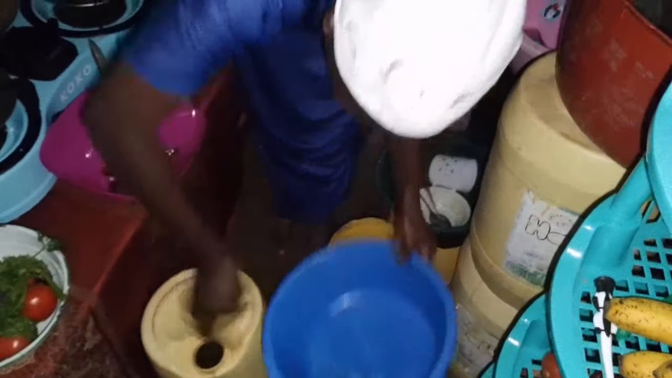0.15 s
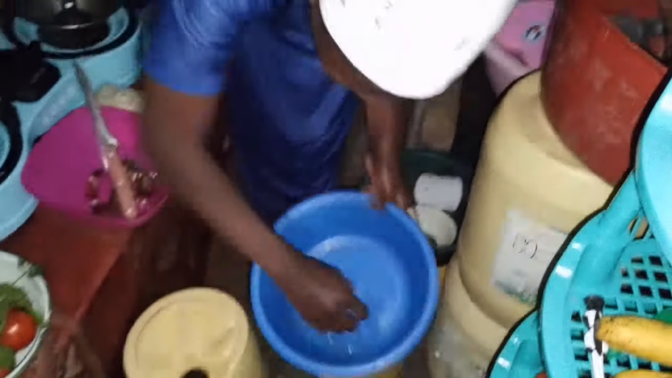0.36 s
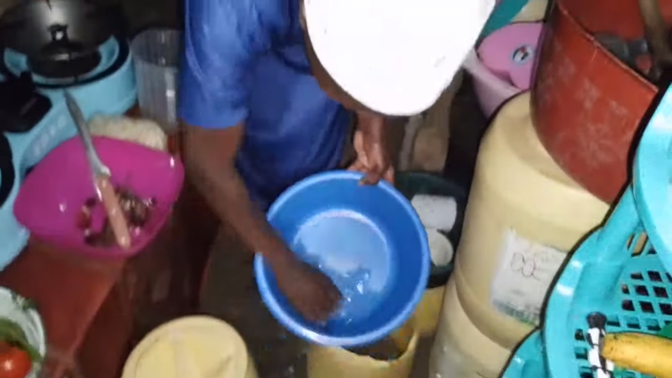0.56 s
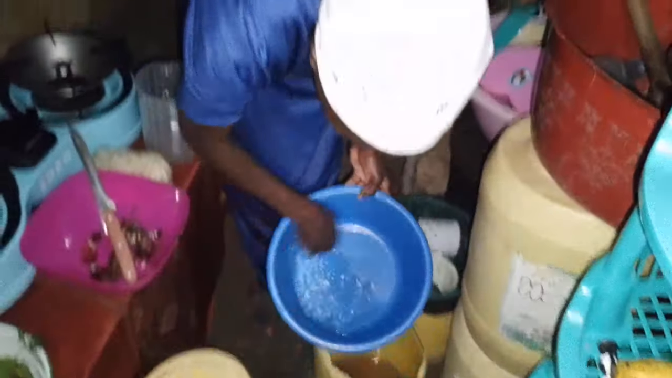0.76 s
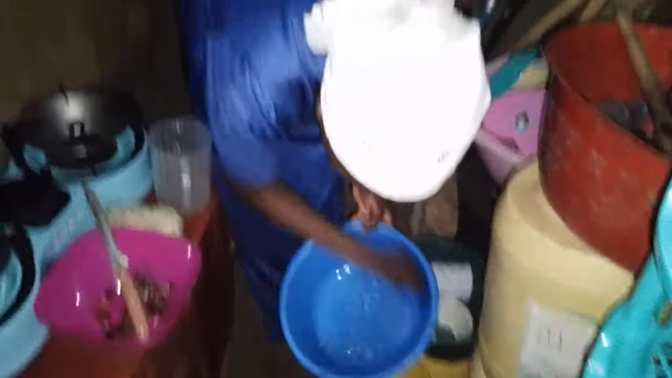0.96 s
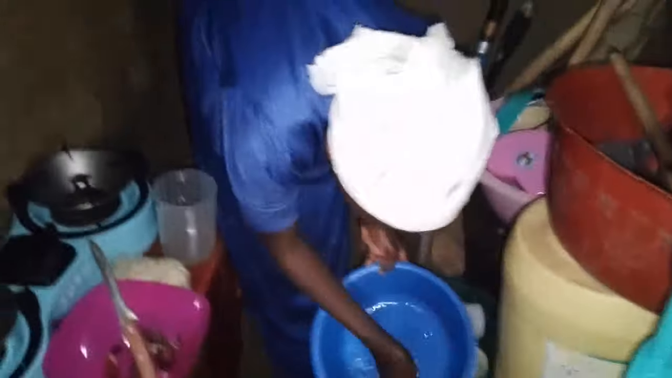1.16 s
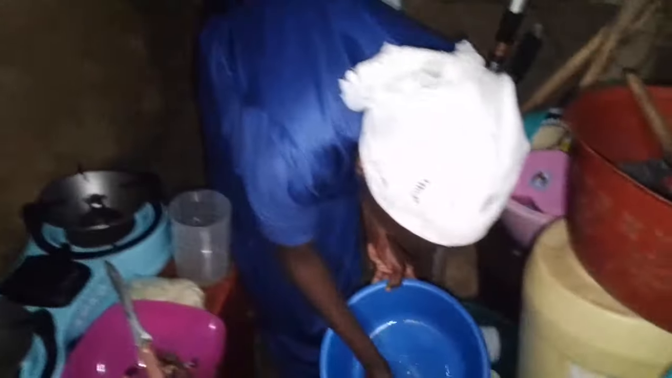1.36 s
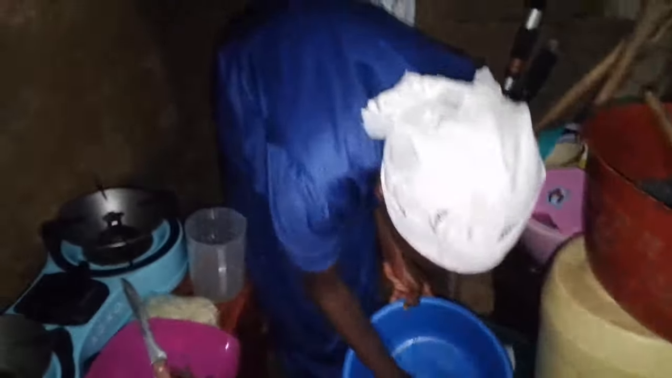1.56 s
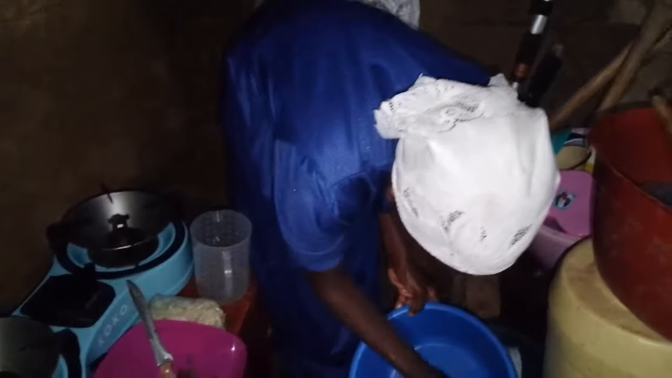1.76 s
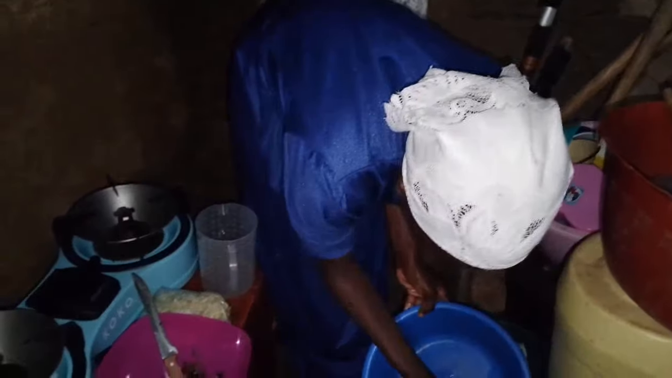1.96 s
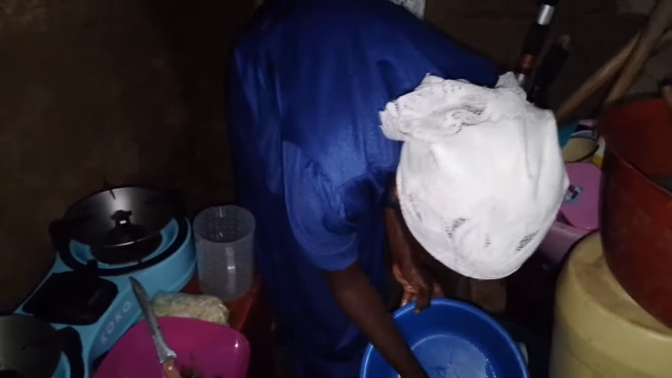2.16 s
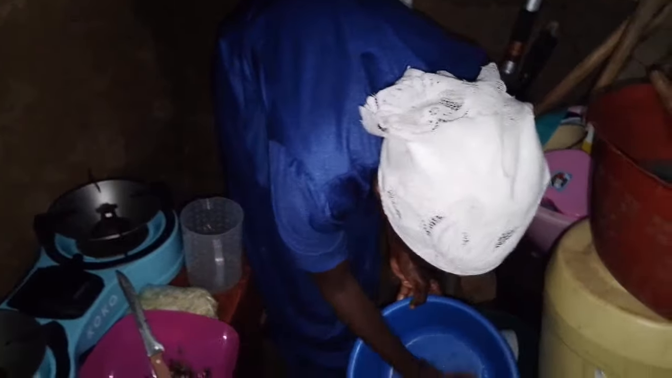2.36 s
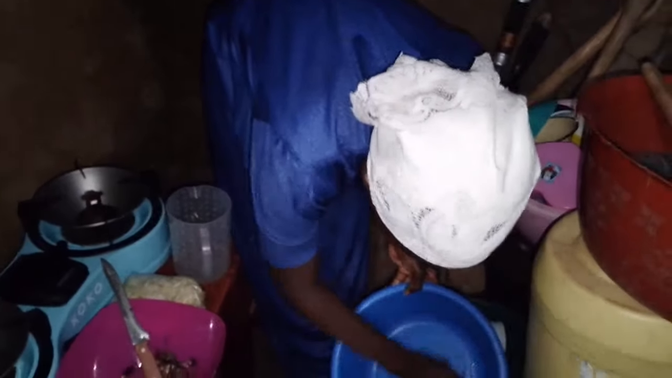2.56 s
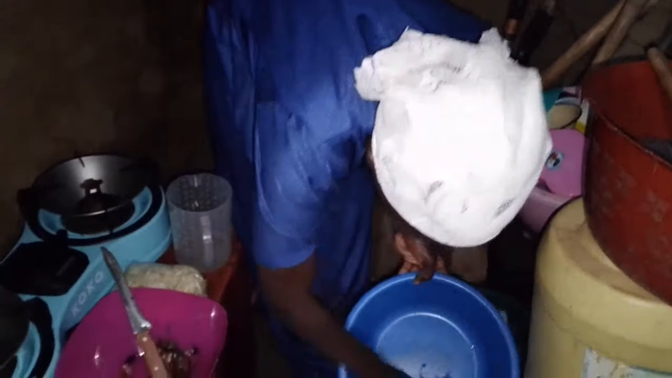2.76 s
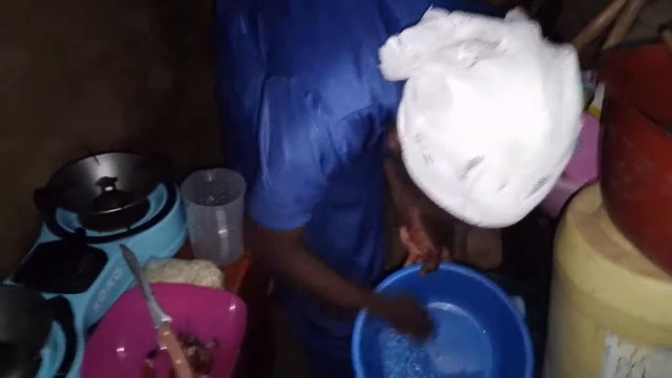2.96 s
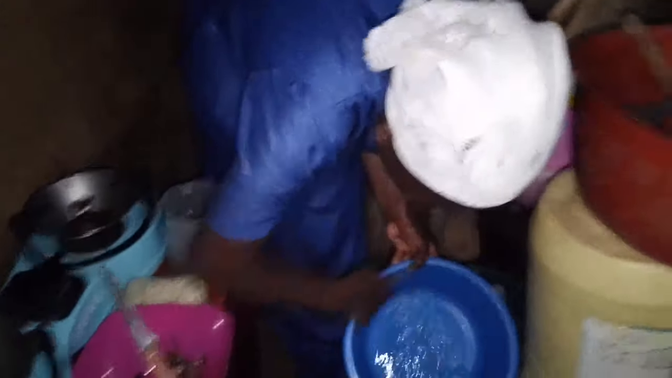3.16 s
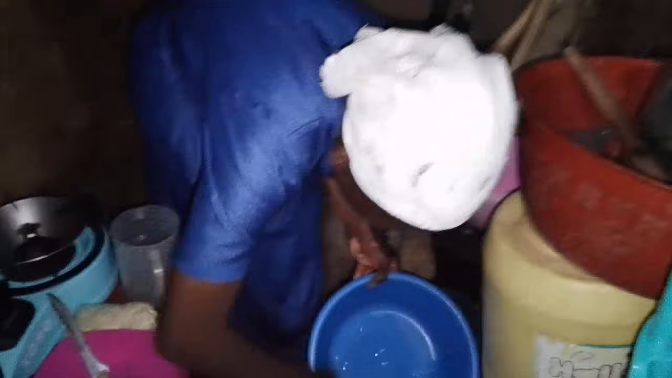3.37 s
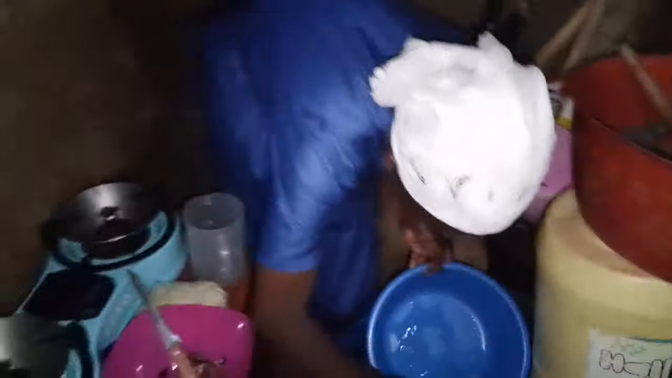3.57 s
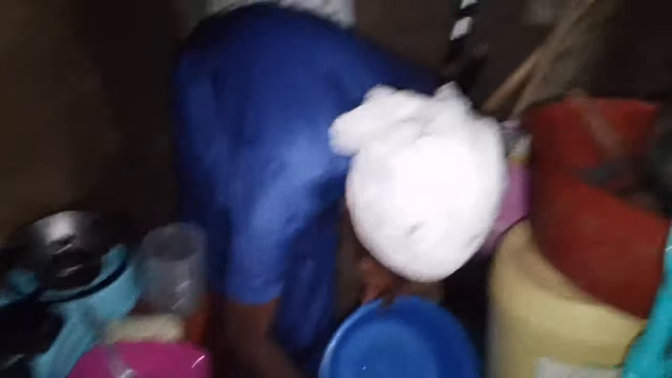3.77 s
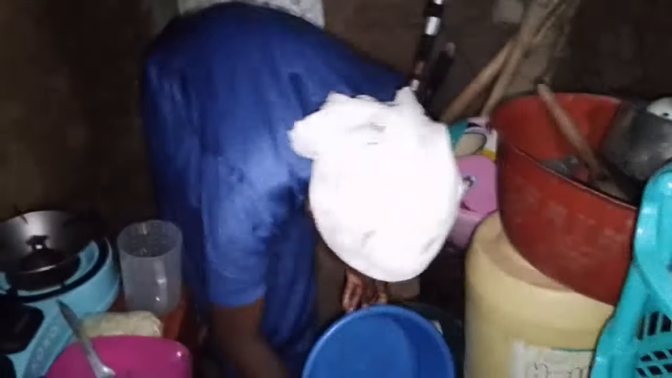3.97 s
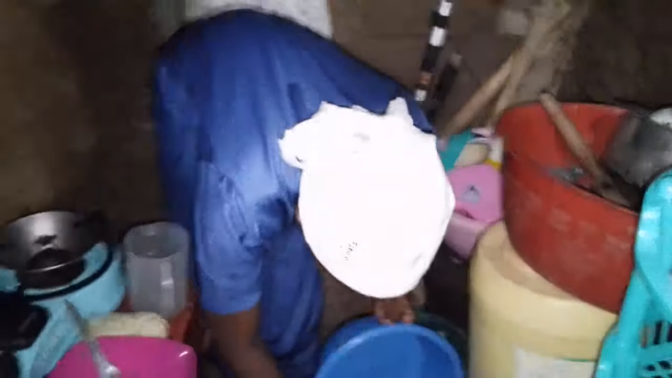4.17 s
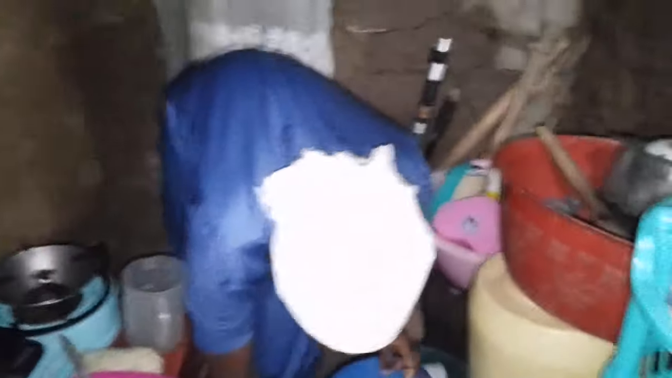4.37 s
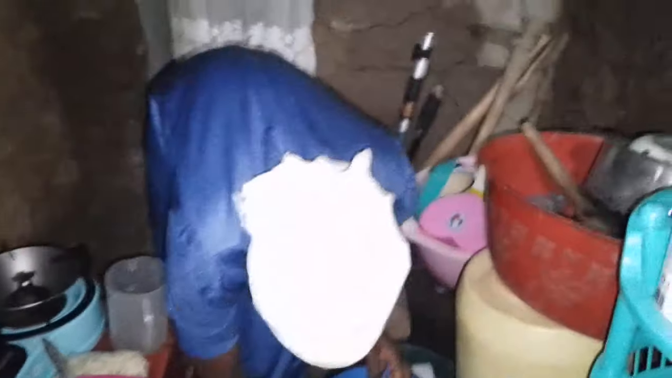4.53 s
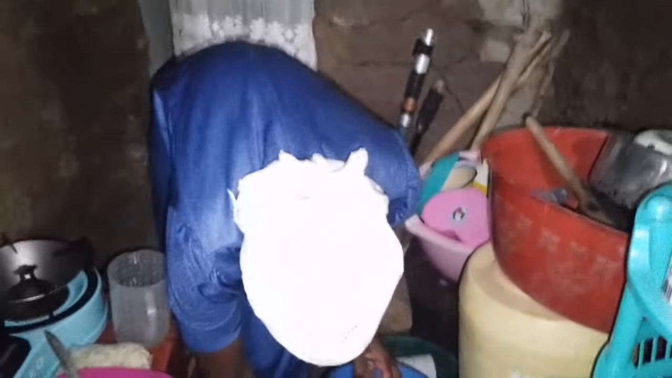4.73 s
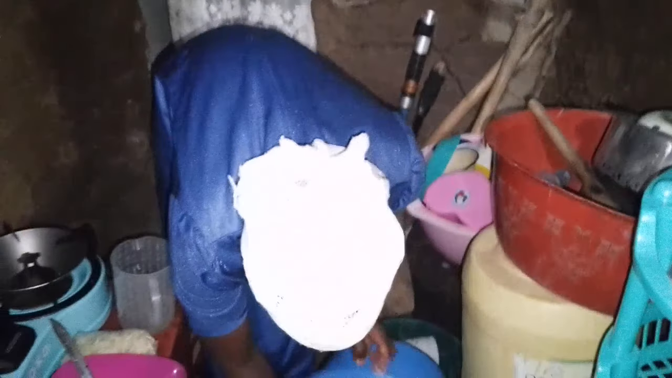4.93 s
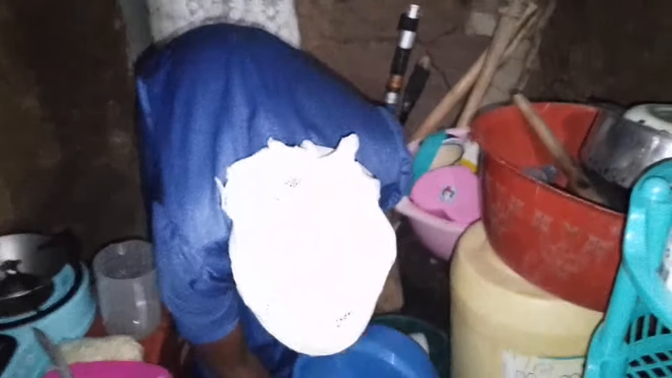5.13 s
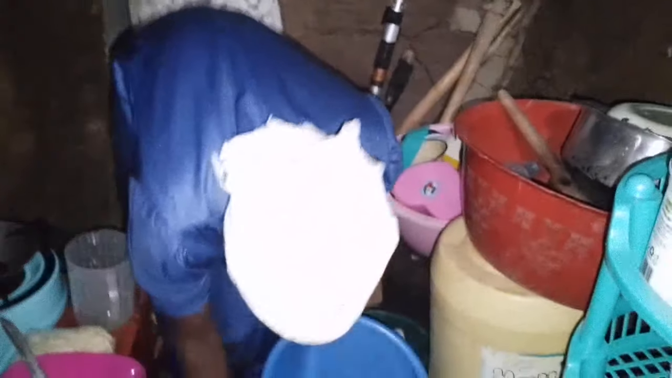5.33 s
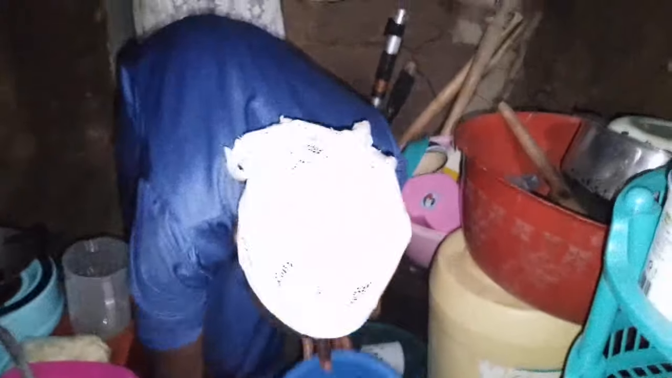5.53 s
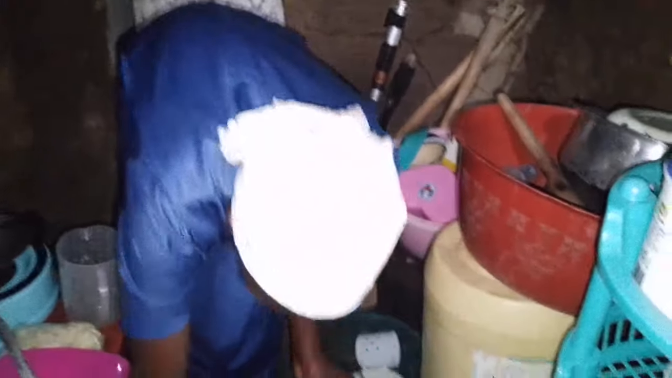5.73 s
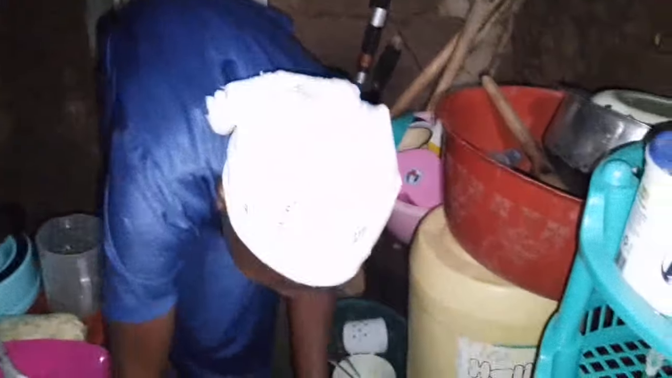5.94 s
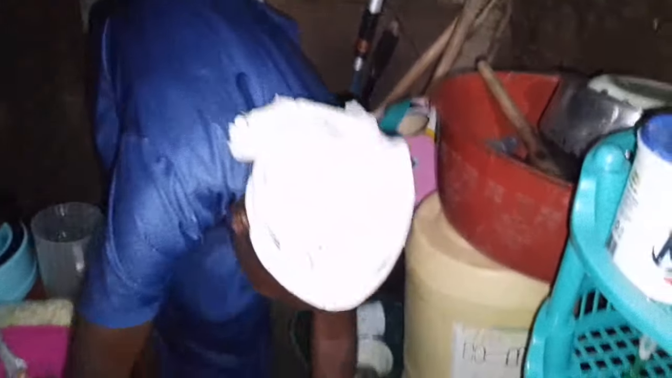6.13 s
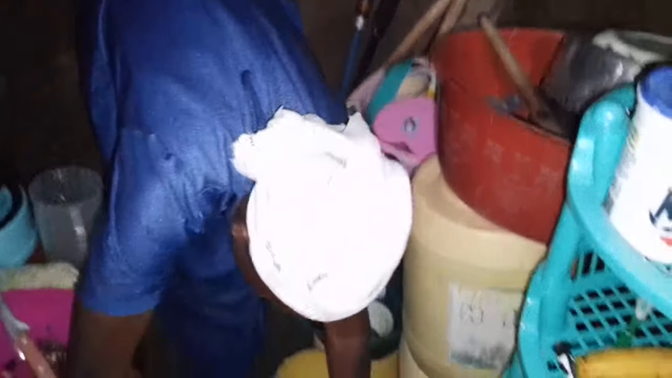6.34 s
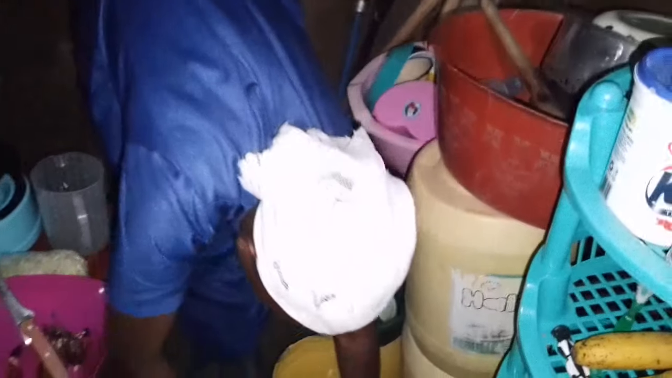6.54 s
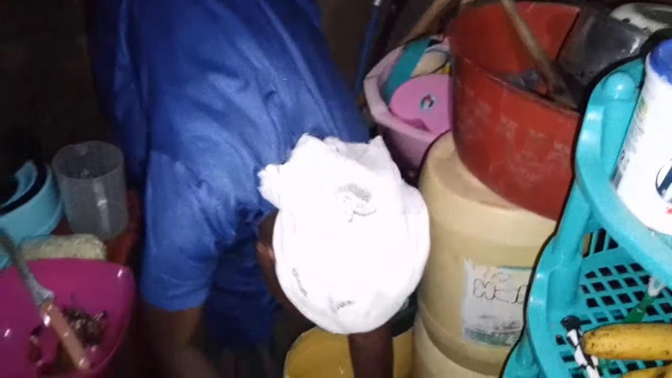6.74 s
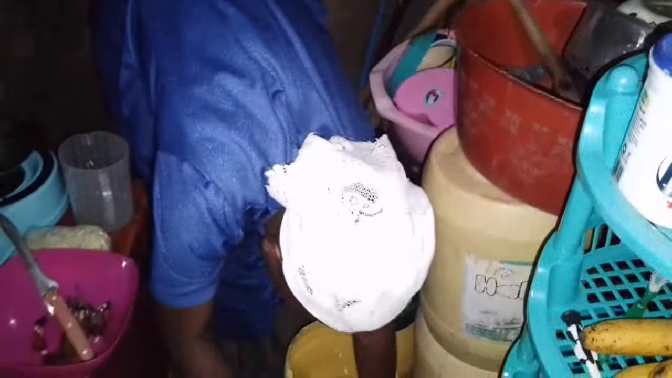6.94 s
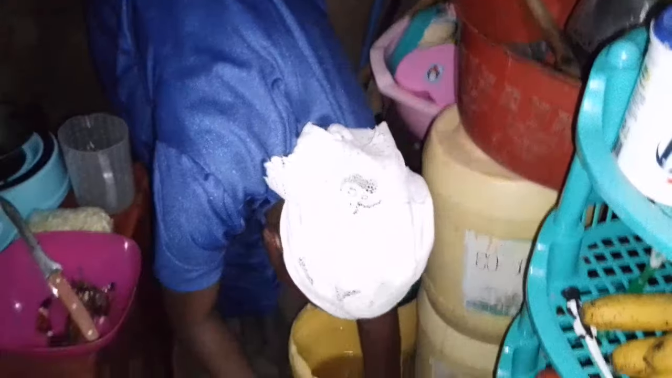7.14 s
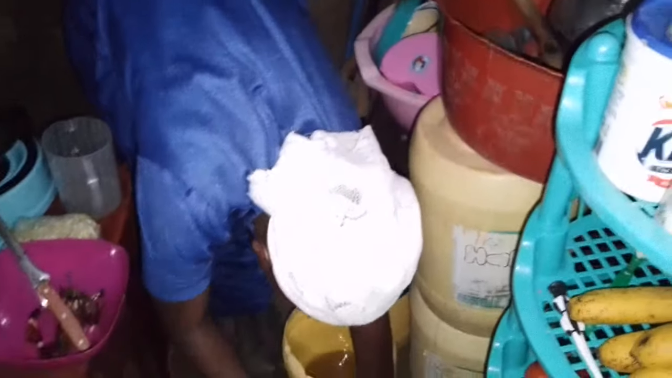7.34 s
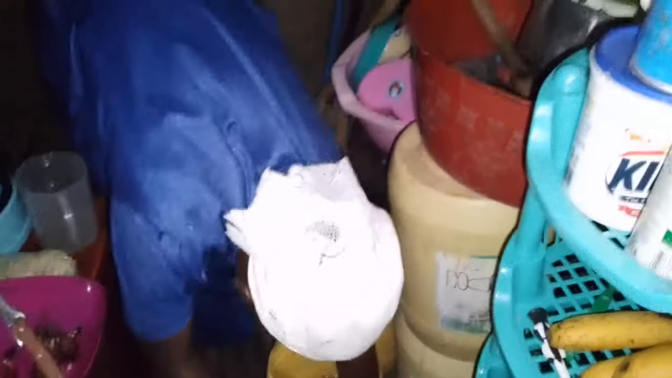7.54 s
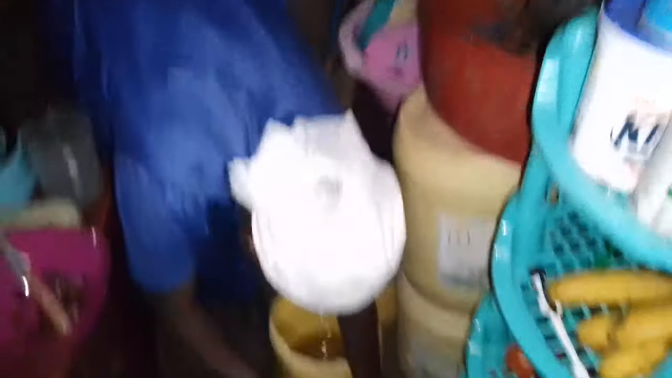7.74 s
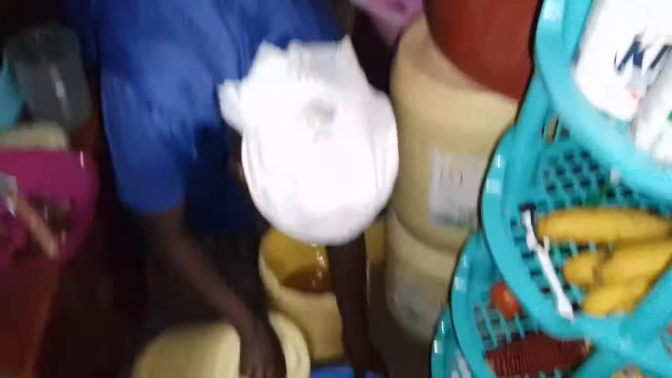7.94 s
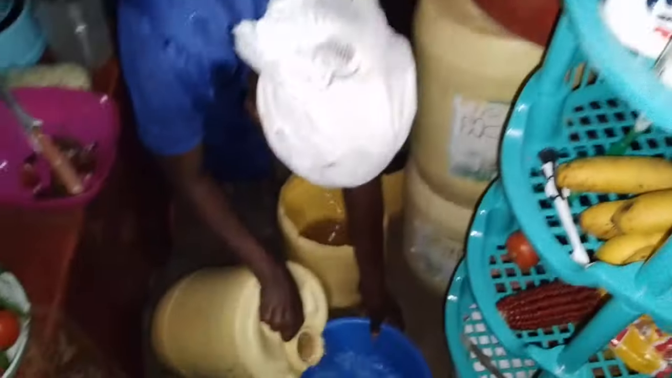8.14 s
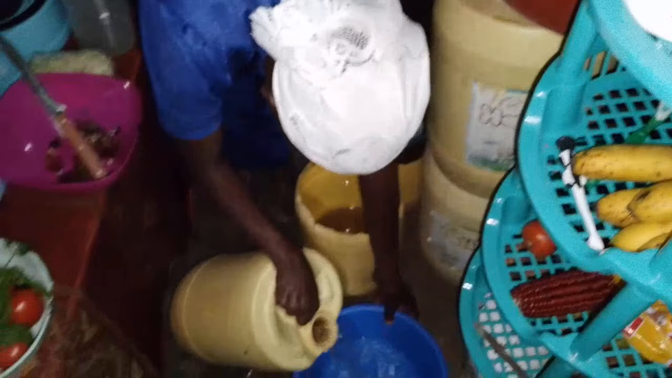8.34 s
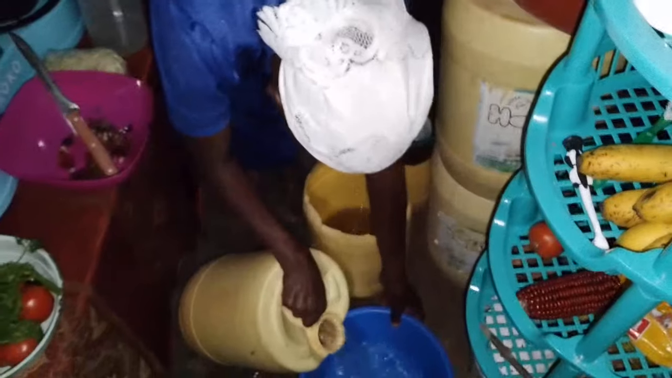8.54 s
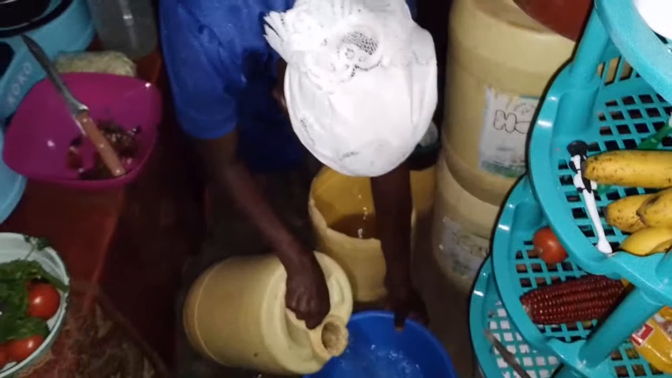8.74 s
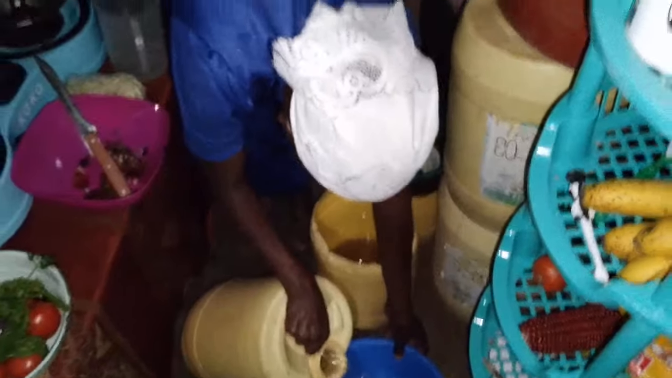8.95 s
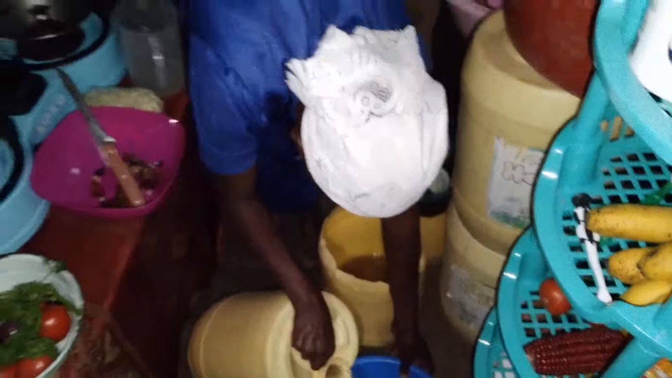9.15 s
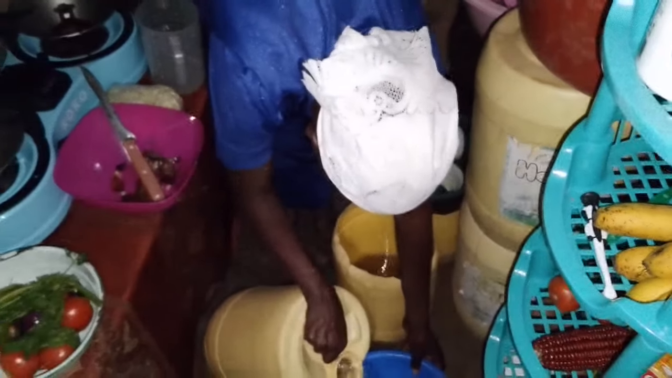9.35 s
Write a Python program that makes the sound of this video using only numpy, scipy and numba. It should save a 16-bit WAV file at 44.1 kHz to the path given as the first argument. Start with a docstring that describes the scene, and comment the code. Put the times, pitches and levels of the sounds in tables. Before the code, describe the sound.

A close phone microphone in a small, barely reverberant kitchen, with faint shrill crickets and low rumble behind. At 0 s there is a soft hollow plastic boom and near quiet; from 0.45 to 0.85 s a hand slaps water in a basin, bright and bubbly. Light swirling follows, with splashes at 1.4 and 1.7 s. A busier burst runs from 2.2 to 3.5 s, with sharp drops, low wall thuds and a strong slap near 2.55. It thins to a tiny drip at 3.75. From 4.3 to 4.9 s the water is tipped into a bucket: a dense gush, hollow knocks and gulps. Quiet with slight sloshes and soft plastic bumps lasts until 6.6. Splashes and heavier thumps at 6.7 to 7.3 begin the pouring, which hesitates, then from 7.8 becomes a loud, steady, gurgling, splashing stream until the end around 9.4 s.

```python
"""Water slaps and swirls round a plastic basin, is tipped into a bucket, then pours from a jerrycan.
Swarms of dying sines make the bubbles (small, large) and the fine spray; noise and sines make each slap,
smack, gulp and knock, and wide resonances boom like plastic walls as the basin is set down.
Crickets shrill outside as a band of noise; a small kitchen adds sparse reflections.
A phone microphone listens from close by; faint bands drop away towards silence."""
import sys
import numpy as np
from scipy import signal
from scipy.fft import rfft, irfft, next_fast_len
from scipy.io import wavfile
from scipy.ndimage import uniform_filter1d
from numba import njit

SR = 44100
rng = np.random.default_rng(int(sys.argv[2]) if len(sys.argv) > 2 else 0)


def store_pcm(level_fs):
    """Save levels as 16-bit WAV."""
    pcm = np.round(np.clip(level_fs, -1, 1) * 32767).astype(np.int16)
    wavfile.write(sys.argv[1], SR, np.atleast_2d(pcm).T)


N = 414540  # length in samples

# Knocks and glugs in the plastic vessels.
# Each row: start in seconds, level in dB before the ring builds up, pitch in Hz.
KNOCK_ROWS = [(0.009, -33, 322), (2.088, -28, 160), (2.231, -28, 150.7), (2.616, -27, 480),
              (2.62, -25.5, 1042), (2.7, -28, 426), (3.362, -41, 441), (3.429, -33, 425),
              (4.32, -24.5, 886), (4.372, -20, 809), (4.499, -24.5, 868), (4.578, -17, 431),
              (4.658, -20, 422), (5.532, -31, 185), (5.535, -32, 300), (6.013, -33, 184), (6.61, -36, 407),
              (6.696, -17.5, 402), (6.72, -21, 480), (6.96, -18.5, 113), (6.962, -26, 600),
              (7.105, -24, 174), (7.108, -28, 600), (7.376, -25, 450), (7.641, -30, 190), (7.81, -33, 160),
              (7.935, -33, 191), (8.554, -20, 794)]


def water():
    """The moving water: bubbles and spray surge together, and the vessels ring and boom under them."""
    # The water between waves. Each row: time in seconds, then levels in dB of small bubbles, spray,
    # large bubbles and the booming plastic.
    flow = [(0.0, -56, -76, -62, -41), (0.1, -74, -73, -78, -53), (0.2, -66, -66, -80, -53),
            (0.3, -45, -49, -70, -58), (0.62, -42, -44, -53, -62), (0.75, -49, -47, -63, -69),
            (1.3, -54, -54, -75, -82), (2.0, -53, -49, -66, -80), (2.4, -48, -47, -68, -61),
            (2.8, -48, -52, -66, -67), (3.0, -47, -48, -80, -77), (3.25, -48, -48, -88, -82),
            (3.5, -55, -63, -62, -57), (3.74, -64, -70, -68, -62), (4.2, -70, -58, -72, -68),
            (4.3, -39, -39, -46, -54), (4.86, -39, -41, -41, -47), (4.95, -52, -50, -51, -56),
            (5.42, -80, -62, -75, -79), (6.26, -95, -72, -77, -79), (6.6, -68, -68, -73, -77),
            (7.0, -48, -50, -48, -58), (7.31, -50, -50, -52, -58), (7.35, -58, -57, -60, -64),
            (7.41, -49, -48, -53, -58), (7.96, -39, -38.5, -47, -74), (9.4, -39, -39.5, -45, -85)]
    # Waves thrown against a wall. Each row: crest in seconds, seconds to fall 20 dB, then crest levels
    # in dB of small bubbles, spray and large bubbles.
    waves = [(0.52, .14, -40, -48, -39), (0.665, .045, -34, -33, -46), (1.43, .08, -43, -40, -48),
             (1.7, .12, -49, -41, -57), (2.23, .12, -45, -48, -46), (2.56, .15, -39, -36, -66),
             (2.32, .07, -43, -42, -56), (2.67, .12, -34, -45, -37), (3.08, .15, -45, -43, -85),
             (3.25, .07, -39, -35, -80), (3.37, .15, -46, -50, -51), (4.32, .11, -38, -34, -44),
             (4.65, .15, -37, -38, -39), (5.04, .05, -50, -46, -60), (5.23, .14, -62, -52, -70),
             (5.55, .08, -60, -56, -65), (5.65, .14, -63, -45, -68), (6.03, .12, -61, -62, -61),
             (6.42, .18, -58, -65, -61), (6.72, .09, -42, -34, -46), (6.94, .1, -39, -35, -50),
             (7.82, .1, -38, -35, -48), (8.38, .1, -35, -35, -44), (8.81, .12, -36, -38, -46),
             (9.33, .15, -34, -41, -46)]
    # Spectra of the three swarms. Each row: frequency in Hz, relative level per Hz in dB.
    small_colour = [(700, -59), (1100, -7), (1400, 0.5), (2300, 3.5), (3500, 1), (5600, -7.5), (7300, -7.5),
                    (12000, -93)]
    spray_colour = [(2650, -30), (4500, -2), (5420, -4.5), (8510, 0.5), (11000, -1.5), (12300, -9),
                    (15100, -13), (16000, -8)]
    large_colour = [(250, -45), (400, -16), (480, -1), (600, 1.5), (900, 2.5), (1400, -1), (1900, -27),
                    (3000, -92.5)]
    # Resonances of the plastic walls. Each row: frequency in Hz, width in Hz, relative level in dB.
    walls = [(140, 52, 6), (180, 40, 7), (250, 120, 9), (320, 60, 10)]
    # Air column that the tipped water rings. Each row: frequency in Hz, width in Hz, relative level in dB.
    air_column = [(920, 110, -5), (1550, 40, -6), (2000, 70, -3), (2690, 60, 3), (3320, 90, 1)]
    # How strongly the bucket rings. Each row: time in seconds, level in dB against the small-bubble level.
    tipping = [(4.22, -42), (4.3, -4.5), (4.85, -8), (4.95, -50)]
    # A faint hollow hiss in the basin. Each row: crest in seconds, seconds to fall 20 dB, level in dB.
    hollow_hiss = [(2.66, .5, -46), (3.9, .35, -57), (5.65, .3, -66)]
    # Resonances of the basin, applied squared. Each row: frequency in Hz, width in Hz,
    # relative level in dB before squaring.
    basin = [(1663, 190, 0), (2700, 150, -3), (4040, 150, -6)]
    wave_boom_db = -13.0  # large bubbles in a wave shake the wall
    after_db, after_s, wall_top_hz = -21.0, 0.14, 350  # low knocks leave the walls booming; s to fall 20 dB

    small_db, spray_db, large_db, boom_db = curve(flow)
    # a wave builds faster than it falls
    small_wave, spray_wave, large_wave = swells(waves, steeper=1.4)
    after_rows = [(s + .02, after_s, db + after_db) for s, db, hz in KNOCK_ROWS if hz < wall_top_hz]
    after = swells(after_rows, steeper=8.0)[0]

    surge = wander(14.0)
    small = swarm(small_colour, 30, 2.3, gain_of(2.4 * surge), count=24000)
    spray_clumps = gain_of(2.6 * surge + 0.55 * wander(25))
    spray = swarm(spray_colour, 34, 0.67, spray_clumps, count=32000)
    large = swarm(large_colour, 18, 1.9, gain_of(1.8 * surge), count=6000)
    boom = through(rng.standard_normal(N) * gain_of(4 * wander(20)), walls)

    churn = np.hypot(gain_of(small_db), small_wave)
    stream = churn * small
    stream += np.hypot(gain_of(large_db), large_wave) * large
    stream += np.hypot(gain_of(spray_db), spray_wave) * spray

    bucket = churn * gain_of(curve(tipping)[0]) * through(small + large, air_column)
    ring = swells(hollow_hiss, steeper=2.5)[0] * through(small, basin, order=2)
    shake = np.hypot(gain_of(boom_db), after)
    shake = np.hypot(shake, gain_of(wave_boom_db) * large_wave)
    wash = hollows(stream, patchy_db=2.4)
    return wash + bucket + ring + shake * boom


def swarm(colour, turns, spread_db, clumps, count):
    """Bubbles of many sizes swell in clumps; a few are much louder than the rest."""
    when, pitch, luck, long, glide = rng.random((count, 5)).T
    low_hz, top_hz = colour[1][0], colour[-1][0]
    hz = low_hz * 0.8123 * (top_hz / low_hz / 0.786) ** pitch
    cycles = turns * 3.5 ** (2 * long - 1)
    loudness = gain_of(spread_db * np.minimum(-np.log(luck + 1e-9), 5))
    size = loudness * hz / np.sqrt(cycles)  # equal energy per Hz
    start = (when * N).astype(np.int64)
    length = (cycles / hz * SR).astype(np.int64) + 1
    step = 2j * np.pi * hz / SR
    climb = np.exp(step * 0.14 * glide / length)  # pitch climbs by up to 14 %
    out = ring_all(np.zeros(N + SR), start, length, np.exp(step), climb, size + 0j, cycles)
    return evened(coloured(out[:N], colour) * clumps)


@njit
def ring_all(out, start, length, step, climb, size, turns):
    """Adds one dying, climbing sine for every bubble, as a turning pointer."""
    for k in range(len(start)):
        pointer, turn = size[k], step[k]
        for i in range(length[k]):
            u = i / length[k]
            pointer *= turn
            turn *= climb[k]
            rise = u * turns[k]  # full after one cycle
            out[start[k] + i] += pointer.imag * (1 - u) * (1 - u) * (1 - u) * (rise if rise < 1 else 1.)
    return out


def hollows(x, patchy_db):
    """Hollows between hand, wall and wave favour narrow bands for a moment, then others."""
    z = signal.stft(x, nperseg=512, noverlap=384)[2]
    patches = uniform_filter1d(rng.standard_normal(z.shape), size=3, axis=0)  # across frequency
    patches = uniform_filter1d(patches, size=36, axis=1)  # along time
    gain = gain_of(patchy_db * evened(patches))
    return signal.istft(z * evened(gain), nperseg=512, noverlap=384)[1][:N]


def splashes():
    """Each slap of water: a tick, froth round one pitch, a clear bubble and a slower swell of spray."""
    # Each row: start in seconds, reference level in dB, bubble pitch in Hz, spray peak in dB against
    # the reference, seconds the froth takes to fall 60 dB.
    slaps = [(0.459, -28, 1390, -13, 0.11), (0.474, -23, 2610, -17, 0.04), (0.525, -23, 2810, -12, 0.051),
             (0.615, -21, 4000, -8, 0.061), (0.629, -24, 2200, -14, 0.09), (0.655, -19, 3880, -3, 0.06),
             (0.819, -21, 2850, -22, 0.03), (1.404, -30, 4240, -4, 0.067), (1.423, -25, 2880, -6, 0.059),
             (1.674, -28, 3290, -4, 0.078), (1.945, -32, 3280, -5, 0.037), (2.55, -14, 3590, -24, 0.036),
             (2.611, -22, 1700, -15, 0.13), (2.648, -26, 1150, -16, 0.079), (2.771, -17, 2260, -43, 0.031),
             (2.846, -30, 2800, -8, 0.11), (2.913, -22, 2940, -16, 0.063), (3.089, -27, 3900, -2, 0.11),
             (3.171, -24, 3510, -8, 0.035), (3.23, -22, 5300, -6, 0.06), (3.362, -24, 1770, -18, 0.048),
             (3.433, -23, 2450, -20, 0.03), (3.755, -40, 1550, -20, 0.07), (4.29, -15, 3400, -17, 0.059),
             (4.425, -21, 3180, 0, 0.1), (4.491, -15, 2660, -21, 0.037), (4.636, -20, 2690, -3, 0.07),
             (6.403, -27, 2350, -43, 0.06), (6.470, -32, 2220, -40, 0.07), (6.69, -32, 1030, 3, 0.084),
             (6.788, -27, 4650, -29, 0.036), (6.889, -21, 2100, -8, 0.03), (6.92, -27, 2230, -4, 0.082),
             (6.997, -28, 999, -6, 0.056), (7.031, -24, 1900, -12, 0.09), (7.152, -21, 2580, -15, 0.063),
             (7.177, -20, 2810, -16, 0.057), (7.234, -28, 2120, -3, 0.11), (7.276, -19, 2710, -15, 0.049),
             (7.308, -24, 2790, -5, 0.063), (7.454, -28, 2920, -12, 0.04), (7.487, -29, 2960, -8, 0.11),
             (7.561, -25, 2760, -5, 0.03), (7.648, -25, 2710, -4, 0.096), (7.767, -12, 4170, -15, 0.052),
             (7.773, -19, 2200, -9, 0.07), (7.812, -18, 3490, -8, 0.034), (7.944, -19, 2360, -6, 0.051),
             (7.995, -20, 2470, -8, 0.05), (8.053, -26, 2330, 1, 0.081), (8.166, -15, 2260, -7, 0.047),
             (8.246, -16, 2740, -14, 0.049), (8.351, -18, 3520, -5, 0.048), (8.383, -21, 2440, -13, 0.086),
             (8.53, -21, 2160, -6, 0.09), (8.628, -24, 2260, -2, 0.109), (8.692, -25, 2350, -3, 0.099),
             (8.798, -30, 1010, 4, 0.11), (8.991, -28, 2440, 4, 0.11), (9.092, -24, 1790, -12, 0.075),
             (9.251, -19, 2170, -7, 0.035), (9.298, -17, 2150, -10, 0.035)]
    clear_db, blur = -9.0, 0.33  # the more spray, the fainter the clear bubble (dB, dB per dB)
    puff_share = 0.2  # the spray peaks after this share of t60
    froth_width, narrower = .38, .007  # share of the pitch; less spray rings narrower (share per dB)
    out, t = np.zeros(N), np.arange(6000) / SR
    noise = rng.standard_normal((len(slaps), 2, 6000))
    spray_band = signal.butter(2, [5000, 13000], "band", fs=SR)
    puffs = evened(signal.lfilter(*spray_band, noise[:, 1]))
    for (s, db, hz, spray_db, t60), hiss, puff in zip(slaps, noise[:, 0], puffs):
        fall = gain_of(db - 60 * t / t60)
        u = t / (puff_share * t60)
        puff = puff * (u * np.exp(1 - u)) ** 2
        wide = np.clip(froth_width + narrower * spray_db, .05, .5)
        froth_band = signal.butter(2, [hz * (1 - wide), hz * (1 + wide)], "band", fs=SR)
        froth = evened(signal.lfilter(*froth_band, hiss))
        add(out, s, gain_of(db - 18) * np.exp(-t / .001) * froth)  # tick
        add(out, s, gain_of(-7.5) * fall * (1 - np.exp(-t / .003)) * froth)
        add(out, s, gain_of(db + spray_db) * puff / abs(puff).max())
        clear = bubble(hz, t60 * .8, .15, .004)
        add(out, s, gain_of(db + clear_db - blur * spray_db) * clear)
    return out


def drops():
    """Each drop smacks the surface: a sharp sine burst of a few cycles."""
    # Each row: start in seconds, level in dB before the trim below, pitch in Hz.
    smacks = [(0.475, -20, 2120), (0.481, -20, 2250), (0.526, -19, 3030), (0.67, -16, 4090),
              (1.674, -25, 3480), (2.612, -19, 2260), (2.652, -20, 1630), (2.831, -21, 1910),
              (2.914, -24, 3190), (3.117, -24, 3280), (3.363, -23, 2510), (3.435, -25, 2190),
              (7.152, -22, 2400), (7.278, -23, 3070), (7.768, -16, 4030), (7.813, -21, 2800),
              (7.945, -17, 2950), (8.168, -20, 2280), (8.247, -17, 2750), (8.284, -21, 5180),
              (8.561, -20, 2010), (9.093, -22, 2130)]
    turns_to_crest, trim_db = 0.8, -1.5  # cycles; the froth completes the peak
    out, t = np.zeros(N), np.arange(400) / SR
    for s, db, hz in smacks:
        u = t * hz / turns_to_crest
        add(out, s, gain_of(db + trim_db) * np.sin(2 * np.pi * hz * t) * u * np.exp(1 - u))
    return out


def knocks():
    """A soft blow on plastic: one ring with a rough low thump round it and a shorter second wall mode."""
    ring_s, duller = 0.075, 0.3  # s to fall 60 dB at 400 Hz; low pitches ring longer by this power
    out, t = np.zeros(N), np.arange(6000) / SR
    for s, db, hz in KNOCK_ROWS:
        t60 = ring_s * (400 / hz) ** duller
        thump_band = signal.butter(2, [hz * 0.6, hz * 1.8], "band", fs=SR)
        thump = evened(signal.lfilter(*thump_band, rng.standard_normal(6000)))
        thump *= gain_of(-60 * t / t60) * (1 - np.exp(-t / 0.0021))
        add(out, s, gain_of(db - 16.0) * thump)
        add(out, s, gain_of(db) * bubble(hz, t60, 0.016, 0.013))
        add(out, s, gain_of(db - 10) * bubble(hz * 1.45, t60 * 0.52, .03, 0.0018))  # second wall mode
    return out


def gulps():
    """A pocket of air swells into a wavering tone and slides in pitch as its shape changes."""
    # Each row: start in seconds, length in seconds, peak in dB before the waver, first and last pitch in Hz.
    pockets = [(0.16, .075, -39, 320, 255), (3.06, .06, -40, 1800, 1850), (4.72, .09, -35, 945, 970),
               (4.77, .14, -36, 290, 225), (4.86, .06, -35, 480, 610)]
    out, waver = np.zeros(N), gain_of(2.5 * wander(30))
    for s, length, db, first_hz, last_hz in pockets:
        u = np.arange(0, length, 1 / SR) / length
        hz = first_hz + (last_hz - first_hz) * u ** 2
        tone = np.sin(2 * np.pi * np.cumsum(hz) / SR)
        add(out, s, gain_of(db) * np.sin(np.pi * u) ** 2 * tone)
    return out * waver


def kitchen(x, t60=0.091):
    """Sparse reflections of random sign, dying away by 60 dB in t60 seconds."""
    at = np.arange(120, 12000, 20)
    taps = np.zeros(12020)
    place = at + rng.integers(0, 20, len(at))
    taps[place] = rng.choice([-1., 1.], len(at)) * gain_of(-60 * at / SR / t60)
    return signal.oaconvolve(x, taps / np.linalg.norm(taps))[:N]


def night():
    """A chorus of far crickets as one shrill band of noise, faint room air and a lumpy rumble."""
    # Spectra of crickets, room air and rumble. Each row: frequency in Hz, relative level per Hz in dB.
    cricket_colour = [(2530, -65), (4400, -40), (4690, 7), (5460, 2.5), (5520, -16.5), (5600, -17),
                      (7280, -53), (12300, -120)]
    air_colour = [(53, -31.5), (90, 28.5), (233, -24.5), (289, -58), (367, -11.5), (910, -46),
                  (4130, -45.5), (5130, -11), (15800, -17.5)]
    rumble_colour = [(15, -28.5), (43, -10), (120, -19), (160, -27), (260, -120)]
    # Air on the microphone. Each row: time in seconds, level in dB before the lumps.
    rumble = [(0.0, -67), (3.1, -62), (3.45, -57), (6.2, -63), (7.0, -59), (9.4, -53)]
    # Handling bumps. Each row: crest in seconds, seconds to fall 20 dB, level in dB.
    bumps = [(1.21, .15, -50), (9.08, .18, -40), (9.31, .1, -48)]
    noise = rng.standard_normal((3, N))
    cricket_db = -60.5 + 1.5 * wander(60) + 0.66 * wander(1.8)
    crickets = gain_of(cricket_db) * coloured(noise[0], cricket_colour)
    air = gain_of(-70.5) * coloured(noise[1], air_colour)
    lumps = gain_of(curve(rumble)[0] + 2.5 * wander(6.0))
    level = np.hypot(lumps, swells(bumps, steeper=2.5)[0])
    return crickets + air + level * coloured(noise[2], rumble_colour)


def bubble(hz, t60, glide, rise=0.0024):
    """A dying sine whose pitch climbs as the bubble nears the surface, by the share glide over t60."""
    t = np.arange(round(t60 * SR) + 8) / SR
    phase = 2 * np.pi * hz * (t + glide * t ** 2 / (2 * t60))
    return np.sin(phase) * gain_of(-60 * t / t60) * (1 - np.exp(-t / rise))


def swells(rows, steeper):
    """For each level column: all rows' swells, rising and falling evenly in dB, summed in power."""
    t = np.arange(0, N / SR + .01, .002)
    s, fall, *levels = np.transpose(rows)[:, :, None]
    shape_db = -20 * np.maximum(t - s, steeper * (s - t)) / fall
    sums = [np.linalg.norm(gain_of(db + shape_db), axis=0) for db in levels]
    return [np.interp(np.arange(N) / SR, t, total) for total in sums]


def wander(per_s):
    """Slow chance: noise low-passed at per_s Hz, rms 1."""
    low_pass = signal.butter(2, per_s, fs=SR / 32)
    steps = signal.lfilter(*low_pass, rng.standard_normal(N // 32 + 1))
    return evened(np.interp(np.arange(N) / 32, np.arange(len(steps)), steps))


def curve(rows):
    """Level columns of a table, drawn as straight lines with one value a sample."""
    s, *columns = np.transpose(rows)
    return [np.interp(np.arange(N) / SR, s, c) for c in columns]


def coloured(x, points):
    """Filters by a spectrum joined up on a log frequency scale, rms 1."""
    f, db = np.transpose(points)
    return filtered(x, lambda hz: gain_of(np.interp(np.log(hz + 1), np.log(f + 1), db)))


def through(x, modes, order=1):
    """Passes a sound through summed resonances, raised to a power, rms 1."""
    def gain(hz):
        peaks = sum(gain_of(db) / (1 + (2 * (hz - f) / w) ** 2) for f, w, db in modes)
        return peaks ** order
    return filtered(x, gain)


def filtered(x, gain):
    """Filters by a gain given as a function of Hz, rms 1."""
    size = next_fast_len(N)
    spectrum = rfft(x, size) * gain(np.fft.rfftfreq(size, 1 / SR))
    return evened(irfft(spectrum, size)[:N])


def add(mix, s, sound):
    """Mixes a sound in at time s in seconds."""
    part = mix[max(round(s * SR), 0):][:len(sound)]
    part += sound[:len(part)]


def gain_of(db):
    """Turns dB into gain."""
    return np.exp(np.asarray(db) * np.log(10) / 20)


def evened(x):
    """Scales to rms 1."""
    return x / np.sqrt(np.mean(x ** 2) + 1e-20)


def scene():
    """Near sounds with their room, over the night."""
    near = water() + splashes() + drops() + knocks() + gulps()
    return (near + gain_of(-8.0) * kitchen(near) + night())[None]


def record(dry):
    """Bands whose smoothed power sinks under a threshold are turned down; then a low-pass."""
    # Level under which a band fades out. Each row: frequency in Hz, power in dB.
    fade_level = [(150, -92), (350, -94.5), (900, -76), (2200, -90), (3900, -78), (4600, -95), (6600, -88),
                  (7600, -98)]
    edge_hz = 15900
    hz, _, z = signal.stft(dry[0], SR, nperseg=1024, noverlap=768)
    power = uniform_filter1d(abs(z) ** 2, size=15, axis=1)
    power_db = 10 * np.log10(abs(power) + 1e-18)
    fade_db = np.interp(hz, *np.transpose(fade_level))[:, None]
    under_db = np.clip(fade_db - power_db, 0, 15)
    kept = signal.istft(z * gain_of(-1.8 * under_db), nperseg=1024, noverlap=768)[1][None, :N]
    low_pass = signal.firwin(1023, edge_hz, window=("kaiser", 10), fs=SR)
    return signal.oaconvolve(kept, low_pass[None], "same")


dry = scene()
out = record(dry)
store_pcm(out)
```